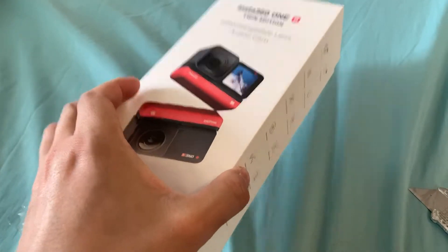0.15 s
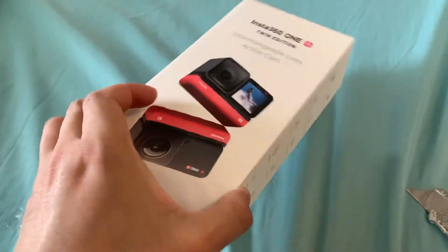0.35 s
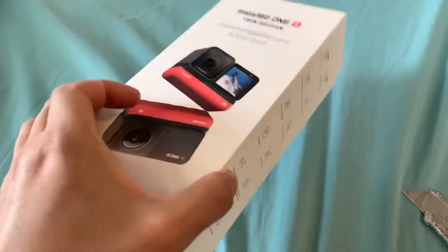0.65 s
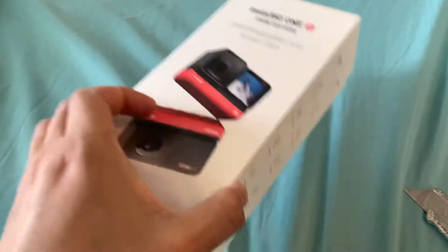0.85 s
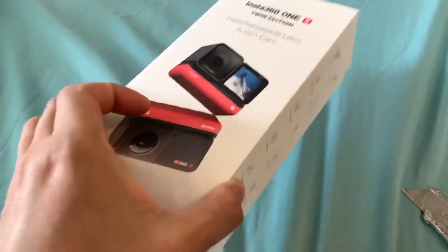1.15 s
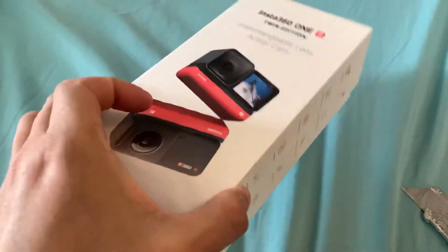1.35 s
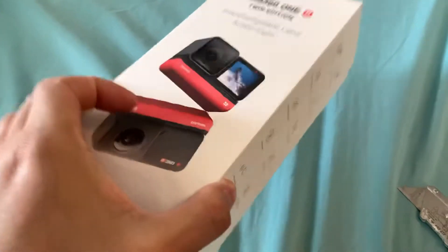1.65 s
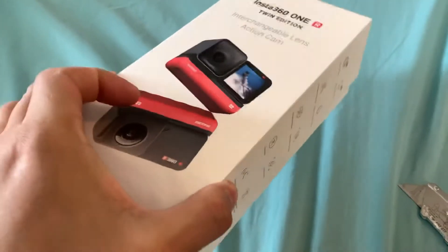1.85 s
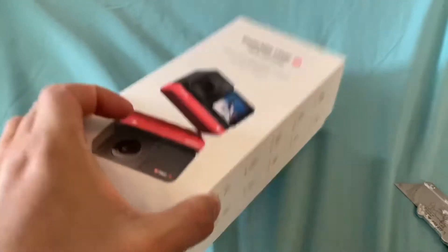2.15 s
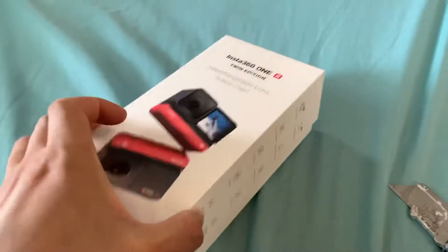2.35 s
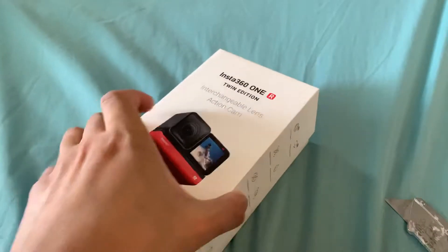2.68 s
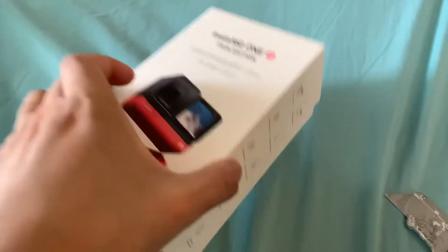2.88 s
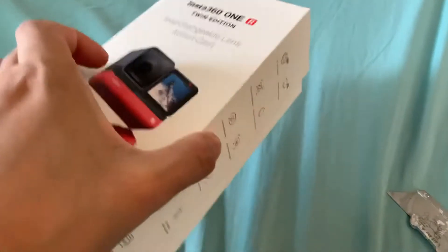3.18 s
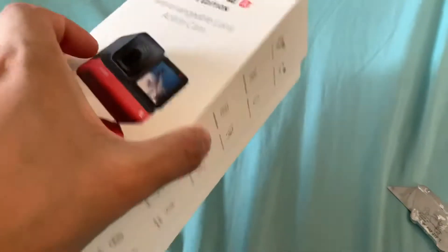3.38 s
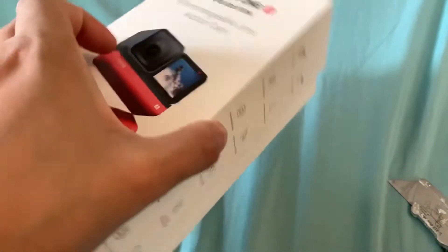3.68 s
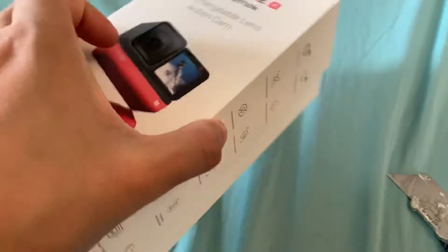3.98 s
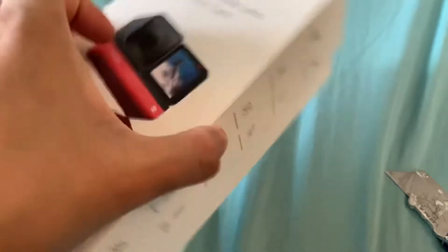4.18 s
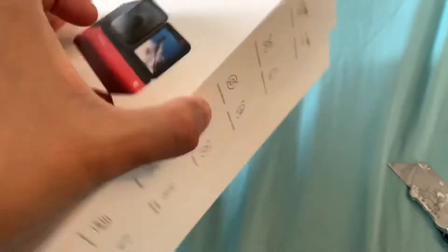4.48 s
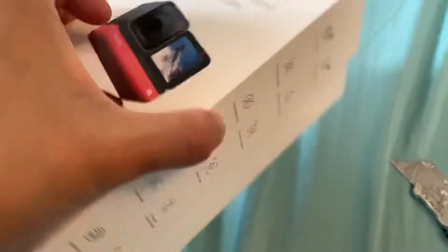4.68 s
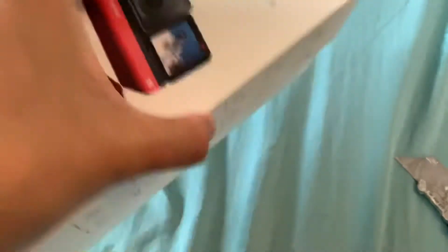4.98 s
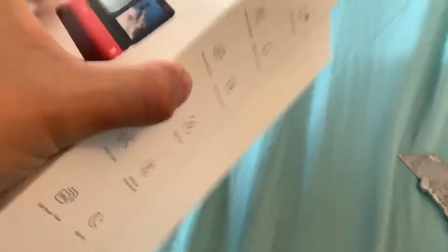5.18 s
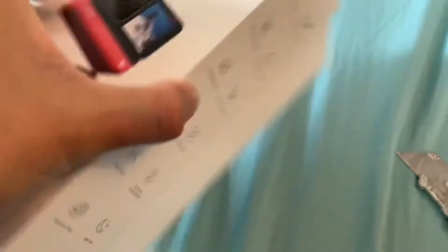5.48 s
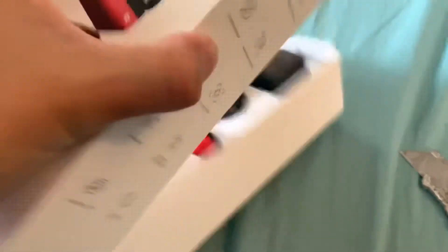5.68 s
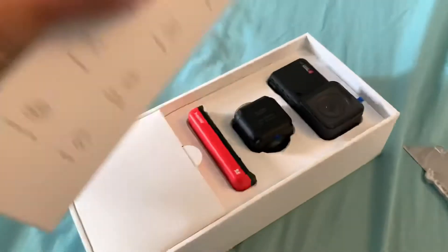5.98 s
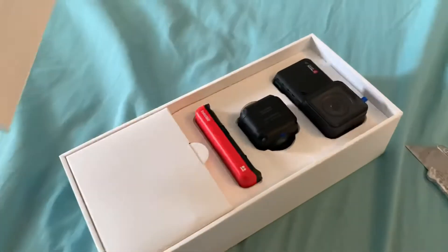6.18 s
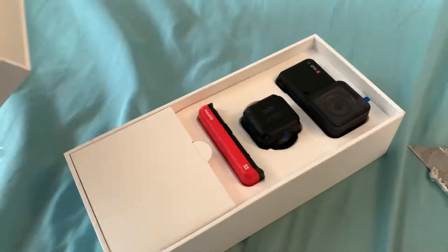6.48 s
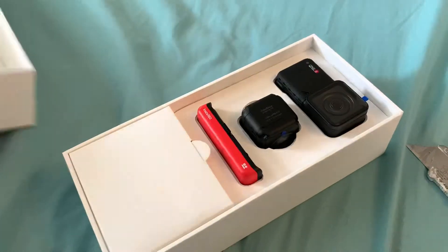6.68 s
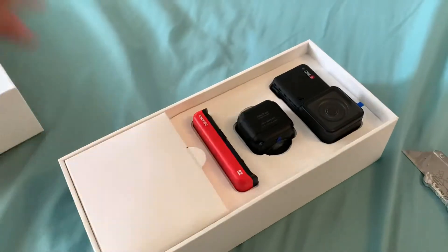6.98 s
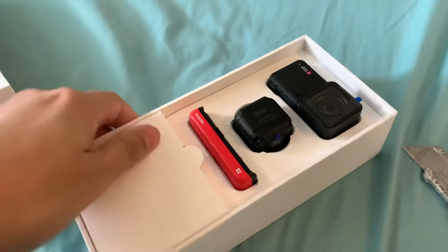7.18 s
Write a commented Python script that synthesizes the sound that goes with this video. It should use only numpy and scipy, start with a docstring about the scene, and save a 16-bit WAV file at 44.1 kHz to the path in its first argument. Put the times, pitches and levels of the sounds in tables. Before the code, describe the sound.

A close stereo microphone in a small, quiet furnished room picks up very faint air and hum. From about 0.4 to 1.5 seconds, fingers shift on a stiff hollow cardboard box with light taps, the firmest near 1.5. Soft low bumps and a little bedding rustle come around 2.0 to 2.5. From 2.8 the tight lid starts to give, with a low grainy shudder, dry rubbing and tiny snaps. Knocks gather from 3.7, becoming a firmer cluster near 4.1, then easing through scattered creaks and bumps until 5.2. Between 5.3 and 5.8 the lid comes free in the loudest moment: rapid hollow thumps, rough scrapes, cracks and short skids, with panels ringing briefly as the tray drops. It falls quiet at once. Padded bumps and faint cloth brushing occur around 6.5, then a small tap and soft fingertip slide across card near 7.0, and a slight scrape at 7.2.

```python
"""In a small quiet room with a faint hum, a hand works the tight lid of a stiff cardboard box on a bed upward.
Knocks are a tap, a thump and echoes; snaps are short noise bursts; the box panels ring after both.
Streams of tiny random jerks make the shudder and scrape of the lid as it comes free and the tray drops.
Low noise wobbles the mattress; soft grainy hiss is bedding brushing and fingertips sliding over the card."""
import sys
import numpy as np
from scipy import signal
from scipy.fft import rfft, irfft, next_fast_len
from scipy.io import wavfile
from scipy.ndimage import uniform_filter1d

SR = 44100
rng = np.random.default_rng(int(sys.argv[2]) if len(sys.argv) > 2 else 0)


def waveform_to_disk(signal):
    """Save audio, clipped to [-1, 1], as 16-bit WAV at the path in sys.argv[1]."""
    frames = np.transpose(np.atleast_2d(signal))
    scaled = np.clip(frames, -1, 1) * 32767
    samples = np.round(scaled).astype(np.int16)
    wavfile.write(sys.argv[1], SR, samples)


N = 323870
TIME = np.arange(N) / SR

# knocks on the box: (time [s], thump level [dB], thump pitch [Hz], tap level [dB])
BOX_KNOCKS = [(0.408, -50.5, 205, -50), (0.751, -31.5, 191, -38.5), (1.037, -35.5, 228, -34.5),
              (1.142, -37.5, 274, -36), (1.284, -54.5, 340, -51.5), (1.407, -44, 290, -54),
              (1.535, -23.5, 205, -34.5), (2.017, -30.5, 80.5, -61.5), (2.037, -36.5, 158, -49),
              (2.238, -32, 101, -68), (2.91, -39, 130, -51), (3.156, -42.5, 233, -56),
              (3.226, -48.5, 148, -61), (3.662, -35, 128, -39), (3.766, -35, 145, -41.5),
              (3.835, -26, 250, -30), (3.869, -37.5, 175, -47), (3.95, -34.5, 134, -48),
              (3.996, -34.5, 131, -47), (4.062, -25, 185, -48), (4.097, -22.5, 221, -33),
              (4.203, -23.5, 188, -38.5), (4.266, -39.5, 248, -43), (4.451, -29, 183, -39),
              (4.728, -38.5, 242, -46.5), (4.898, -42, 204, -45), (5.044, -37.5, 222, -50),
              (5.326, -29, 131, -48.5), (5.447, -20, 400, -32.5), (5.453, -24, 206, -35.5),
              (5.509, -22.5, 248, -28), (5.527, -25.5, 161, -30), (5.557, -24.5, 171, -30.5),
              (5.607, -25.5, 229, -35.5), (5.689, -24, 110, -29), (5.762, -32, 141, -39.5),
              (6.451, -34.5, 82, -87), (6.55, -40, 249, -62.5), (6.563, -33.5, 74.6, -67),
              (6.956, -46, 246, -51)]
# effort of the hand that works the lid upward: (time [s], effort [dB])
HAND_EFFORT = [(2.75, -17), (2.82, -3.5), (3.0, -5), (3.06, -6), (3.15, -1.5), (3.3, -9), (3.72, -2),
               (4.08, 7.5), (4.36, 1), (4.67, -7.5), (4.88, -5), (5.02, -9.5), (5.3, 3.5), (5.41, -1),
               (5.53, 17.5), (5.76, -3), (5.9, -36)]


def amp(db):
    """Turns decibels into a gain."""
    return 10 ** (np.asarray(db) / 20)


def unit(x):
    """Scales to rms 1."""
    return x / np.sqrt(np.mean(x ** 2) + 1e-20)


def read(points, hz):
    """Reads a table on a log-frequency axis."""
    f, value = np.transpose(points)
    return np.interp(np.log(hz + 1), np.log(f + 1), value)


def level(rows):
    """Gain that follows (time [s], level [dB]) rows and is practically silent outside them."""
    return amp(np.interp(TIME, *np.transpose(rows), left=-150, right=-150))


def add(mix, s, sound):
    """Mixes a sound in at time s."""
    part = mix[max(round(s * SR), 0):][:len(sound)]
    part += sound[:len(part)]


def shape(x, gain):
    """Filters by a gain, complex if need be, given as a function of frequency."""
    size = next_fast_len(x.shape[-1] + 4096)
    spectrum = rfft(x, size) * gain(np.fft.rfftfreq(size, 1 / SR))
    return irfft(spectrum, size)[..., :x.shape[-1]]


def colour(x, points):
    """Filters x by a table of levels over frequency, then scales it to rms 1."""
    return unit(shape(x, lambda hz: amp(read(points, hz))))


def wander(speed_hz):
    """Slow random motion of rms 1."""
    return unit(shape(rng.standard_normal(N), lambda hz: np.exp(-(hz / speed_hz) ** 2)))


def grains(per_s, spread_db):
    """Random slips of uneven size and either direction, rms 1."""
    size = amp(spread_db * np.minimum(rng.exponential(1, N), 3))
    happens = rng.random(N) < per_s / SR
    return unit(size * rng.choice([-1, 1], N) * happens)


def hump(hz, centre_hz, octaves):
    """A broad resonant hump on a log-frequency axis."""
    return np.exp(-.5 * (np.log2((hz + 1) / centre_hz) / octaves) ** 2)


def pulse(spectrum):
    """The pulse that has this spectrum, with an envelope peak of 1."""
    x = irfft(spectrum)
    return x / abs(signal.hilbert(x)).max()


def bursts(rows):
    """Gain of strokes that swell to a height and die away."""
    gain = np.zeros(N)
    for s, db, rise, fall in rows:
        t = np.arange(max(-10 * rise, -s), 10 * fall, 1 / SR)
        add(gain, s + t[0], amp(db) * np.exp(-np.maximum(-t / rise, t / fall)))
    return gain


def scatter(fall, rise, size=8192):
    """A cloud of reflections of energy 1 that builds up and dies away (times in seconds)."""
    t = np.arange(size) / SR
    cloud = rng.standard_normal(size) * np.exp(-t / fall) * (1 - np.exp(-(t / rise) ** 2))
    return cloud / np.linalg.norm(cloud)


def patchy(x, depth_db):
    """The contact point travels, so narrow resonances come and go."""
    z = signal.stft(x, nperseg=512)[2]
    across_pitch = uniform_filter1d(rng.standard_normal(z.shape), size=3, axis=0)
    field = uniform_filter1d(across_pitch, size=20, axis=1)
    return unit(signal.istft(z * amp(depth_db * unit(field)), nperseg=512)[1][:N])


def friction(gain, points, per_s, spread_db, smooth, flutter_db):
    """Fibres catch and let go over a smooth hiss while the pressure flutters."""
    drive = grains(per_s, spread_db) + smooth * rng.standard_normal(N)
    drive = patchy(drive, depth_db=3.4)
    fluttering = drive * amp(flutter_db * wander(51))
    return gain * colour(fluttering, points)


def background():
    """Still air is coloured noise; the faint hum is sines that waver in level and phase."""
    # still air in the room: (frequency [Hz], level [dB])
    air_colour = [(25, -4), (90, -5), (210, -4), (380, -21.5), (700, -25.5), (1200, -32), (4500, -35),
                  (7300, -41), (9300, -32.5), (15000, -46.5)]
    # steady hum in the room: (frequency [Hz], level [dB])
    hum_tones = [(97, -84), (190, -69)]
    air_db = -68.5
    hum = np.zeros(N)
    for hz, db in hum_tones:
        gain = amp(db + 1.5 * wander(4)) * np.sqrt(2)
        hum += gain * np.sin(2 * np.pi * hz * TIME + .4 * wander(4))
    return hum + amp(air_db) * colour(rng.standard_normal(N), air_colour)


def mattress(centre_hz=70, octaves=.45):
    """A dull low wobble that lingers after the box presses into the bed."""
    # wobbles under the box: (time of the height [s], level [dB], rise [s], fall [s])
    wobbles = [(2.07, -44.5, .015, 0.038), (2.34, -48, 0.03, 0.048), (4.11, -32.5, 0.025, 0.017),
               (4.22, -52, 0.026, 0.06), (5.58, -39, 0.019, 0.13), (6.51, -52, 0.038, 0.053),
               (6.6, -42.5, 0.058, 0.075)]
    noise = shape(rng.standard_normal(N), lambda hz: hump(hz, centre_hz, octaves))
    sway = signal.hilbert(unit(noise))
    # the padding stiffens, so large swings are held back
    held_back = unit(sway.real / np.hypot(abs(sway), 1))
    return bursts(wobbles) * held_back


def brushing(cloth_db=1.5, skin_db=6.0):
    """Soft grainy hiss of bedding along the box and of skin or cloth on smooth card."""
    # bedding along the box: (time of the height [s], level [dB], half length [s])
    brushes = [(2.246, -76.5, 0.084), (2.47, -64.5, 0.1), (6.065, -82.5, 0.1), (6.317, -74, 0.11),
               (6.592, -70, 0.06), (6.755, -75.5, 0.065)]
    # smooth card skids on skin or cloth: (time of the height [s], level [dB], rise [s], fall [s])
    skids = [(2.25, -65.5, 0.025, 0.016), (5.35, -66, 0.0072, 0.012), (5.61, -41.5, 0.0088, 0.0033),
             (5.685, -41, 0.0063, 0.0048), (6.5, -67.5, 0.054, 0.033), (6.56, -54.5, 0.018, 0.034),
             (6.972, -50, 0.013, 0.015)]
    # colours of cloth and of skin: (frequency [Hz], level [dB])
    cloth_colour = [(300, -28), (700, -5.5), (1200, 3), (2200, 1), (4000, -1.5), (7000, -7.5), (10000, -11),
                    (15000, -20)]
    skin_colour = [(200, 14.5), (500, -10.5), (1000, 1), (2000, 3), (4000, -1), (7000, 1.5), (9500, 7.5),
                   (11000, -3), (15000, 4.5)]
    sweeps = sum(amp(db) * np.exp(-((TIME - s) / half) ** 2) for s, db, half in brushes)
    cloth = friction(sweeps, cloth_colour, per_s=6000, spread_db=6.5, smooth=0.57, flutter_db=0.9)
    # fingertips slide over the inner card in one stroke
    start_s, length_s, attack_s, release_s, slide_db = 6.98, 0.24, 0.083, 0.15, -58.5
    t = TIME - start_s
    swell = np.clip(t / attack_s, 0, 1)
    fade = np.exp(-np.maximum(t - length_s, 0) / release_s)
    stroke = amp(slide_db) * swell * fade
    skin = friction(stroke + bursts(skids), skin_colour, per_s=8200, spread_db=7.0, smooth=0.97, flutter_db=1.5)
    return amp(cloth_db) * cloth + amp(skin_db) * skin


def lid(catch_db=5.5, catch_hz=12):
    """The walls rub harder with the pull and with each slip, and scrape in bursts as the lid comes free."""
    # the lid gives way a little, or a finger skids on it: (time [s], level [dB])
    slip_rows = [(1.1, -73), (1.4, -74.5), (1.482, -64.5), (2.626, -74), (2.85, -64), (2.91, -60.5),
                 (3.165, -69), (3.558, -64), (4.35, -65), (4.481, -66), (4.61, -69), (4.799, -59),
                 (4.89, -61), (4.965, -59.5), (6.585, -63.5)]
    # short scrapes of card on card: (time of the height [s], level [dB], rise [s], fall [s])
    scrape_rows = [(2.04, -58, 0.015, 0.032), (5.345, -48.5, 0.012, 0.032), (5.44, -45.5, 0.011, 0.011),
                   (5.513, -47, 0.015, 0.0082), (5.529, -38, 0.0093, 0.007), (5.57, -43.5, 0.0076, 0.012),
                   (5.609, -41.5, 0.0058, 0.012), (5.675, -55.5, 0.017, 0.058), (5.69, -34, 0.011, 0.0066),
                   (5.725, -71, 0.019, 0.03), (7.215, -61, 0.028, 0.012)]
    # colours of the rub and of the scrapes: (frequency [Hz], level [dB])
    rub_colour = [(200, 3), (700, 5.5), (1400, 11.5), (2500, 5.5), (4200, 3), (5500, -4.5), (7500, -9.5),
                  (9500, -7.5), (15000, -36.5)]
    scrape_colour = [(100, -21.5), (400, 23), (800, 10.5), (1200, 5.5), (2000, 8.5), (4000, 9.5), (6000, 2),
                     (9500, 4.5), (11500, -8.5), (14500, -3.5), (15800, -12)]
    slip_rise_s, slip_fall_s = 0.0047, 0.025
    rub_db = -71  # rub at an effort of 0 dB, ahead of the random catches and the final gain
    steady = amp(rub_db + catch_db * wander(catch_hz)) * level(HAND_EFFORT)
    slips = bursts([(s, db, slip_rise_s, slip_fall_s) for s, db in slip_rows])
    rub_gain = np.hypot(steady, slips)
    rub = friction(rub_gain, rub_colour, per_s=1200, spread_db=-2, smooth=0.61, flutter_db=1)
    scrapes = friction(bursts(scrape_rows), scrape_colour, per_s=1400, spread_db=2, smooth=0.21, flutter_db=0.0)
    return amp(2.5) * rub + scrapes


def creep(jerks_per_s=140, grit=0.81, lag_s=0.00501, waver_db=5.0, light_touch_db=-10, bass_hz=150):
    """Tiny stick-slip jerks, each spread by the card like a small knock; only the firm pull moves the whole box."""
    # the fingers shift their hold: (time of the height [s], level [dB], length [s])
    hold_shifts = [(0.424, -55, 0.085), (0.74, -53, 0.06), (1.002, -66, 0.037), (1.089, -51.5, 0.11),
                   (1.399, -54.5, 0.12), (1.49, -52, 0.033), (1.618, -64, 0.38), (2.63, -60, 0.082),
                   (7.209, -55, 0.067)]
    # colour of the shudder: (frequency [Hz], level [dB])
    creep_colour = [(30, -15), (70, 4.5), (140, -1), (260, -3), (400, -11), (800, -18), (1200, -28),
                    (2500, -34.5), (4500, -50), (8000, -51.5)]
    shudder_db = -51.5  # shudder at an effort of 0 dB
    swell_share = 0.5  # share of a shift that is spent swelling
    shiver_db, shiver_rise_s, shiver_fall_s = -24, 0.0096, 0.022  # level is relative to the thump
    jerks = patchy(grains(jerks_per_s, spread_db=3.0) + grit * rng.standard_normal(N), depth_db=3)
    # low pitches trail: the delay is lag_s at 200 Hz and longer below
    trailing = shape(jerks, lambda hz: np.exp(-4j * np.pi * lag_s * np.sqrt(200 * hz)))
    spread = colour(trailing, creep_colour)
    low = shape(spread, lambda hz: 1 / (1 + (hz / bass_hz) ** 4))
    firm = amp(shudder_db) * level(HAND_EFFORT)
    shifts = bursts([(s, db, swell_share * length, (1 - swell_share) * length) for s, db, length in hold_shifts])
    # the fingers slip just before each knock and the box shivers after it
    shivers = bursts([(s, db + shiver_db, shiver_rise_s, shiver_fall_s) for s, db, _, _ in BOX_KNOCKS])
    light = np.hypot(shifts, shivers)
    bass = low * np.hypot(firm, amp(light_touch_db) * light)
    rest = (spread - low) * np.hypot(firm, light)
    # bass and rest waver separately
    return bass * amp(waver_db * wander(22)) + rest * amp(waver_db * wander(22))


def ticks(fall_s=0.00074, octaves=0.44, crumble_db=-13, crumble_fall_s=0.0047, splinter_db=-24, splinter_hz=9000):
    """Fibres snap in a crack a few milliseconds long, and their neighbours crumble after it."""
    # small snaps of the card: (time [s], peak level [dB], centre [Hz])
    snaps = [(1.038, -77, 2200), (2.851, -52.5, 3500), (3.151, -47, 3500), (3.377, -53, 3000),
             (3.494, -46.5, 3000), (3.623, -50, 3000), (3.828, -39.5, 4700), (3.943, -38.5, 2600),
             (4.061, -40, 3100), (4.57, -39.5, 2700), (5.444, -29.5, 1800), (5.604, -36.5, 6000),
             (5.688, -28, 2300), (5.757, -37.5, 1720), (6.649, -46.5, 2700), (6.957, -39, 2200)]
    out, t = np.zeros(N), np.arange(4096) / SR
    tear = np.exp(-t / fall_s) + amp(crumble_db) * np.exp(-t / crumble_fall_s)
    for s, db, centre_hz in snaps:
        noise = rng.standard_normal(len(t)) * tear
        crack = shape(noise, lambda hz: hump(hz, centre_hz, octaves) + amp(splinter_db) * hump(hz, splinter_hz, .6))
        add(out, s, amp(db) * crack / abs(crack).max())
    return out


def echoed(x, db, fall, rise):
    """Adds a fresh cloud of edge echoes to a blow."""
    return x + amp(db) * signal.fftconvolve(x, scatter(fall, rise))[:len(x)]


def knocks(tap_hz=780, tap_octaves=0.39, thump_octaves=0.98, thump_top=1.735, tap_db=-1, crunch_db=-14, crunch_hz=1350):
    """Bending waves run faster at high pitch: each blow arrives as a tap, then a thump, then echoes from the edges."""
    bend_lag_s = 0.007544  # how long a wave two octaves under the tap trails behind it
    margin_s = .04  # room ahead of the pulse, taken off again when it is placed
    out, hz = np.zeros(N), np.fft.rfftfreq(8192, 1 / SR)
    slowness = np.maximum(np.sqrt(tap_hz / np.maximum(hz, 45)) - 1, 0)
    # adding up the delays over frequency gives the phase
    travel = np.exp(-2j * np.pi * np.cumsum(margin_s + bend_lag_s * slowness) * hz[1])
    tap = pulse(hump(hz, tap_hz, tap_octaves) * travel)
    for s, low_db, low_hz, high_db in BOX_KNOCKS:
        # a soft push holds little above its own pitch
        soft = hump(hz, low_hz, thump_octaves) / (1 + (hz / (thump_top * low_hz)) ** 6)
        thump = pulse(soft * travel)
        # every blow lands on another spot, so its echoes are its own
        add(out, s - margin_s, amp(low_db) * echoed(thump, db=-9, fall=0.026, rise=0.0022))
        add(out, s - margin_s, amp(high_db + tap_db) * echoed(tap, db=-4, fall=0.01, rise=0.003))
        # the rough surfaces crunch as they meet
        crunch = shape(scatter(fall=0.007, rise=0.00068), lambda f: hump(f, crunch_hz, 0.69))
        add(out, s, amp(high_db + crunch_db) * crunch / abs(crunch).max())
    return out


def box(x, ring_db=-1):
    """The panels ring on after whatever shakes them."""
    # ringing of the box panels: (frequency [Hz], level [dB], time to fall by 60 dB [s])
    panels = [(137, -12.5, 0.015), (262.4, -18, 0.06), (502.7, -1, 0.057), (581, 0, 0.13),
              (674.7, 2.5, 0.095), (743, -4, 0.04), (786, -7, 0.096), (1173, -5.5, 0.11), (1563, 2.5, 0.25),
              (2005, -8, 0.08), (3040, -21, 0.076), (3670, -24, 0.098)]
    t = np.arange(SR // 3) / SR
    ring = np.zeros(len(t))
    for hz, db, t60 in panels:
        even_out = 2 * np.log(1000) / (t60 * SR)  # long rings do not win by length alone
        ring += amp(db - 60 * t / t60) * np.cos(2 * np.pi * hz * t) * even_out
    return x + amp(ring_db) * signal.oaconvolve(x, ring)[:N]


def room(x, tail_db=-15, bass_hz=170):
    """The short tail of a furnished room; the close box outweighs it most in the bass."""
    # decay of the room: (frequency [Hz], time to fall by 60 dB [s])
    decay = [(80, 0.7), (250, 0.27), (750, 0.42), (2000, 0.34), (6000, 0.17), (14000, 0.14)]
    clouds = np.array([scatter(np.inf, 0.0081, size=SR // 2) for _ in range(2)])
    hz, at, z = signal.stft(clouds, SR, nperseg=256)
    fading = z * amp(-60 * at / read(decay, hz)[:, None])
    tail = signal.istft(fading, SR, nperseg=256)[1]
    tail = tail / np.linalg.norm(tail[0])
    sent = shape(x, lambda hz: hz / np.hypot(hz, bass_hz))
    return amp(tail_db) * signal.oaconvolve(sent[None], tail, axes=1)[:, :N]


def ports(x, treble_hz=450):
    """Two microphone ports share the bass; the treble reaches each by scattered paths that keep changing."""
    # likeness of the two ports: (frequency [Hz], likeness [0-1])
    likeness = [(250, 1), (600, .82), (1100, .58), (1700, .4), (2600, .22), (6000, .2), (9000, .4),
                (14000, .4)]
    # lead of the left port at full likeness: (frequency [Hz], phase [radians])
    left_lead = [(100, 0), (300, .25), (600, .6), (1050, 1.3), (1650, 2.2), (4000, 1.3), (9000, .6),
                 (14000, .3)]
    # left minus right: (frequency [Hz], level [dB])
    balance = [(60, .2), (200, -1.1), (600, 1.6), (1000, 2.5), (2000, -.5), (4500, -2), (9000, 0)]
    side = np.array([[1], [-1]])

    def same(hz):
        return read(likeness, hz)

    def direct_gain(hz):
        tilt = amp(side * read(balance, hz) / 2)
        lead = np.exp(.5j * side * same(hz) * read(left_lead, hz))
        return np.sqrt((1 + same(hz)) / 2) * tilt * lead

    def treble_gain(hz):
        return np.sqrt((1 - same(hz)) / 2) * (1 - 1 / (1 + (hz / treble_hz) ** 6))

    direct = shape(x, direct_gain)
    treble = shape(x, treble_gain)
    # random phases in each short frame scatter the treble
    z = signal.stft(treble, nperseg=128)[2]
    paths = signal.istft(z * np.exp(2j * np.pi * rng.random(z.shape)), nperseg=128)[1][:N]
    return direct + side * treble.std() * unit(paths)


def scene():
    """The box and the bedding sound in the room."""
    shaken = knocks() + ticks() + creep() + lid()
    near = box(shaken) + brushing() + mattress()
    return ports(near + background()) + room(near)


def record(dry):
    """The microphone ports swallow a narrow band of the treble, then the recorder cuts off the top."""
    notch_hz, notch_width_hz, notch_db, edge_hz = 11720, 430, -20, 15800
    heard = shape(dry, lambda hz: amp(notch_db * np.exp(-((hz - notch_hz) / notch_width_hz) ** 2)))
    low_pass = signal.firwin(511, edge_hz, window=("kaiser", 9), fs=SR)
    return signal.oaconvolve(heard, low_pass[None], "same")


dry = scene()
out = record(dry)
waveform_to_disk(out)
```